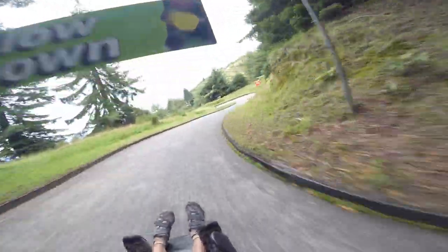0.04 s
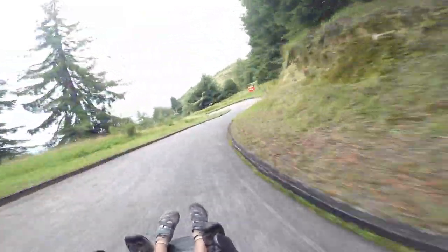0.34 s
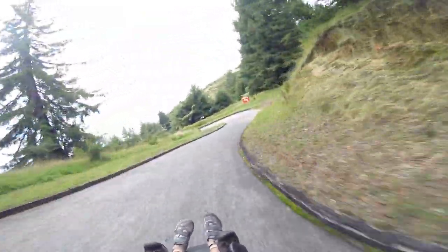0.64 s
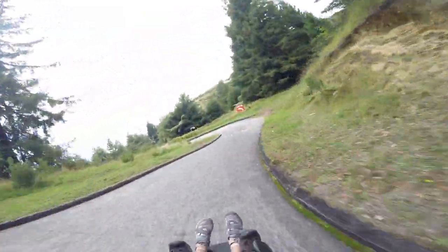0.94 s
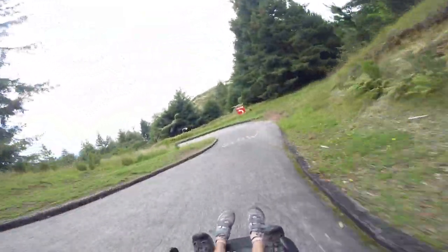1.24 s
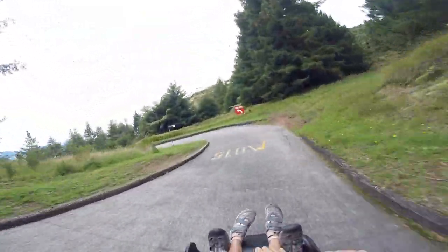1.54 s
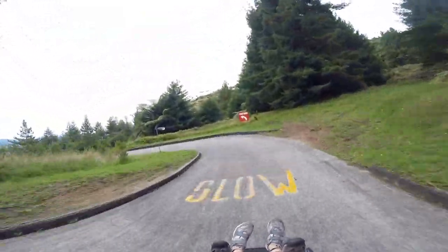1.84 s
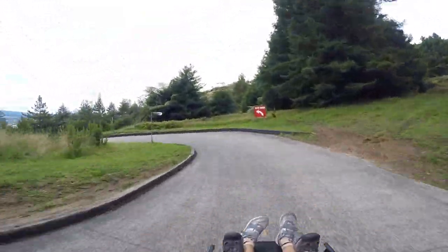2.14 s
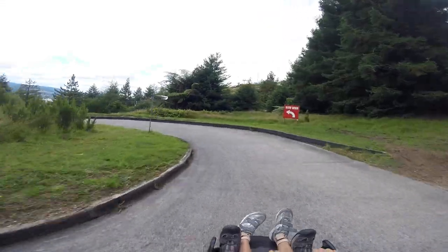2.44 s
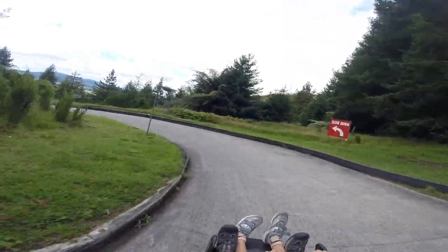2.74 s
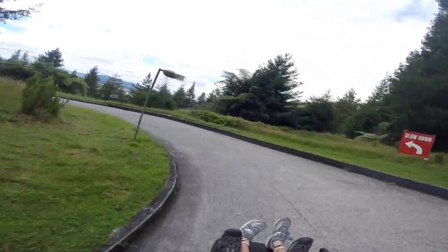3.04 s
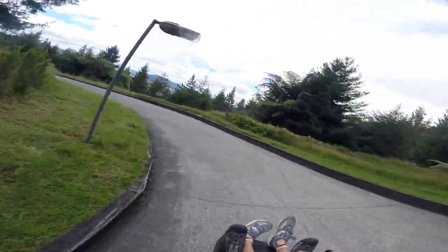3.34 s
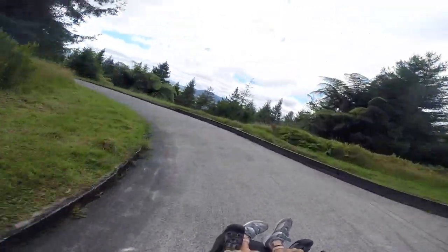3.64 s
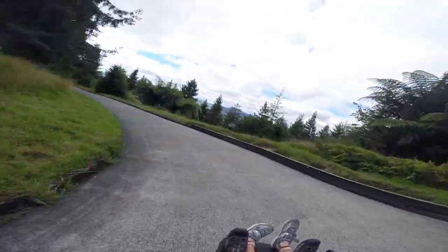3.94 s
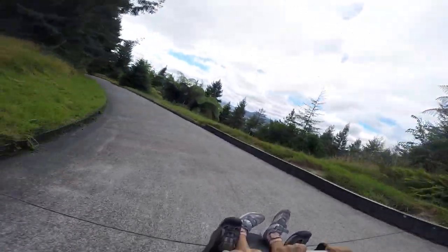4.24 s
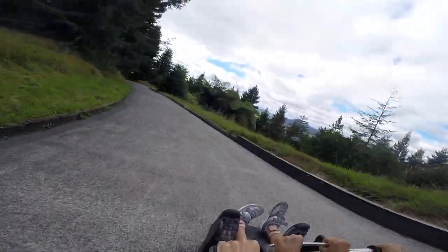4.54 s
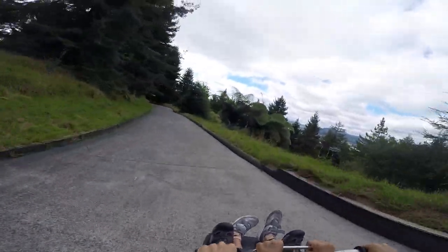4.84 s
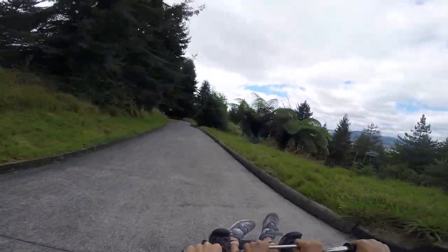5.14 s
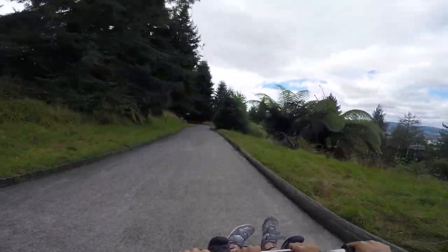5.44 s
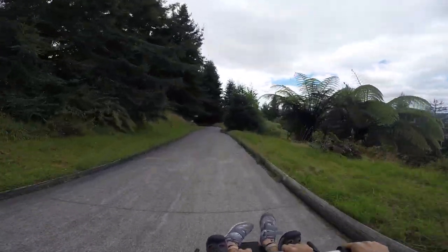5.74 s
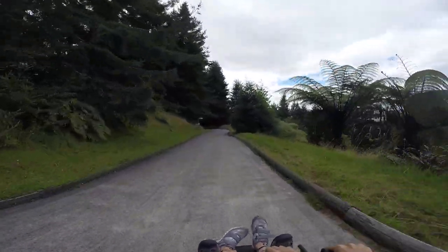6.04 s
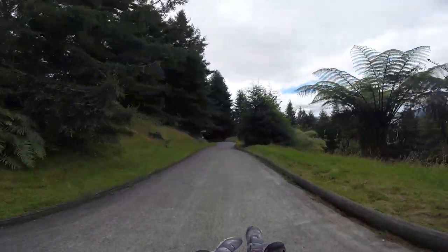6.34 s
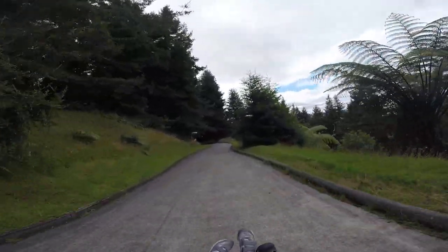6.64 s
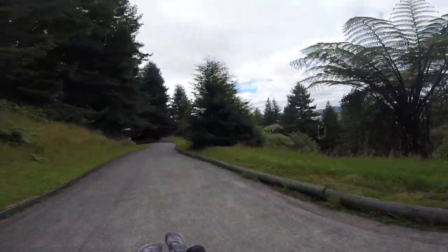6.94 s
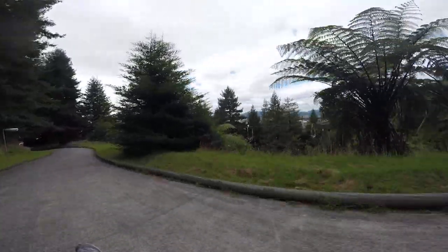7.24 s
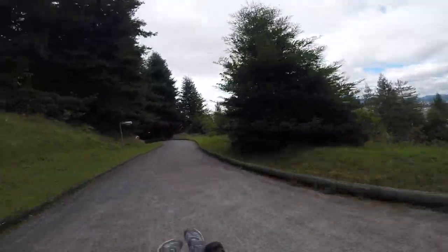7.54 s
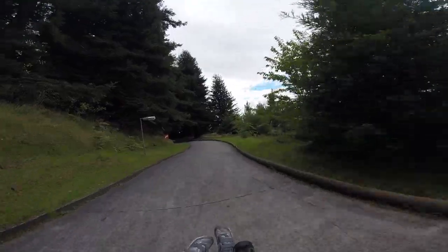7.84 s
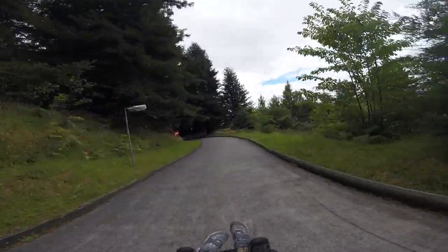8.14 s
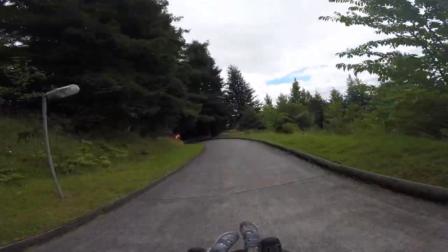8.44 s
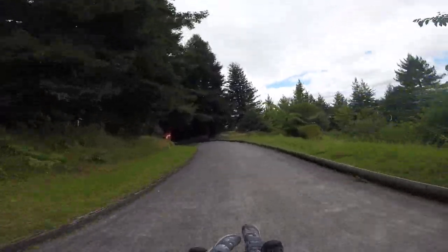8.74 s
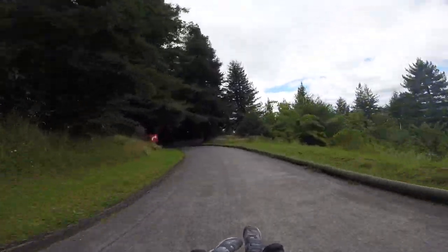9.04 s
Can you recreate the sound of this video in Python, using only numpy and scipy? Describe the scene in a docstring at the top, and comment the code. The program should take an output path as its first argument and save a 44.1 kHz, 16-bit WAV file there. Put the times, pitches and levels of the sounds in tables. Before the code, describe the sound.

A small plastic cart coasts fast down an outdoor asphalt track, heard close from the seat. For all nine seconds, hard wheels make a low, hollow, quickly throbbing rumble with a hum and a gritty hiss, coarsest at the start. Loose plastic parts clatter from about 0.8 to 1.4 seconds, with heavy thuds near 1.2 and 1.7. From 2.3 to 5 seconds, through a bend, the steering linkage adds brighter metallic chatter, with a faint tyre scrub, a tiny squeak at 3.4 and a thud at 4.1. Stones knock in a quick run between 5.3 and 6.5 seconds, with a brief scrub near 5.7. The hum then drops lower and the rattles thin out. Another thud and clatter come around 8.2. Low wind buffets the microphone throughout, strongest near 7 seconds, over a barely audible high electronic whistle.

```python
"""A throbbing rumble with thuds and chatter: a small plastic cart coasts fast down an asphalt track,
microphone at the rider's seat. Just below, road stones drum through hard wheels into the hollow hull
and grit hisses under the tread. Loose parts clack over rough patches; through a long bend the steering
linkage takes over and a tyre scrubs. Wind buffets the microphone over a faint electronic whistle."""
import sys
import numpy as np
from scipy import signal
from scipy.fft import rfft, irfft
from scipy.io import wavfile

SR = 44100
rng = np.random.default_rng(int(sys.argv[2]) if len(sys.argv) > 2 else 0)


def int16_out(signal):
    """Quantize to a 16-bit WAV file."""
    q = np.round(np.clip(np.atleast_2d(signal).T, -1, 1) * 32767)
    wavfile.write(sys.argv[1], SR, q.astype(np.int16))


N = 400428
TIME = np.arange(N) / SR
APEX_S = 4.3  # the long bend loads the wheels most here

# coarseness of the asphalt, above ordinary paving: t/s, level/dB
COARSENESS = [(0, 11), (.6, 6), (1.05, 8), (1.55, 3.5), (2.25, 4), (3.05, -2), (3.3, 3), (5.3, 2),
              (5.75, 4.5), (6.1, 1.5), (9.08, 0)]
# wheels dropping into dips and joints: t/s, peak level/dB, thud f/Hz
DIPS = [(.061, -6, 226), (1.158, -3, 191), (1.714, -3, 205), (2.357, -6, 215), (4.077, -5, 240),
        (4.09, -5, 450), (5.226, -6.5, 240), (5.937, -7, 290), (6.15, -5, 258), (8.18, -1.5, 180),
        (8.282, -6, 178)]
# spectrum of a hard wheel struck on its tread: f/Hz, level/dB
TREAD_SPECTRUM = [(300, -17), (620, -16), (780, 2.5), (900, 3), (1050, 3), (1180, -4), (1300, -6),
                  (1450, -10.5), (1650, -21), (1900, -19.5), (2200, -28), (9000, -78)]
# spectrum of a knock on the hollow body: f/Hz, level/dB
BODY_SPECTRUM = [(150, -7.5), (480, 6.5), (720, 2.5), (1100, -5.5), (1500, -21.5), (3000, -42.5),
                 (9000, -64)]
# the steering linkage's part in the chatter, greatest in the bend: t/s, share/0-1
LINKAGE_SHARE = [(2.25, .1), (2.6, .62), (4.9, .62), (5.5, .25)]
# where the clacks excite the linkage most: t/s, f/Hz
FAVOURED_PITCH = [(1.4, 2200), (2.5, 5000), (3.4, 3700), (4.6, 2300), (7.5, 3900)]


def amp(db):
    """Decibels to gain."""
    return 10 ** (np.asarray(db) / 20)


def unit(x):
    """Scales to rms 1."""
    return x / np.sqrt(np.mean(x ** 2) + 1e-20)


def curve(points, s=TIME):
    """Reads a curve of (time, value) points at the times s."""
    return np.interp(s, *np.transpose(points))


def add(mix, s, sound):
    """Mixes a sound in at time s."""
    part = mix[max(round(s * SR), 0):][:len(sound)]
    part += sound[:len(part)]


def through(x, response):
    """Passes a drive through an impulse response."""
    return signal.oaconvolve(x, response)[:len(x)]


def colour(spectrum, treble_db=0, size=4096):
    """Causal impulse response of energy 1 with a given spectrum and a treble shelf at 5 kHz."""
    hz = np.fft.rfftfreq(size, 1 / SR) + 1
    f, db = np.transpose(spectrum)
    shelf = 1 / (1 + (5000 / hz) ** 4)
    gain = amp(np.interp(np.log(hz), np.log(f), db) + treble_db * shelf)
    cepstrum = irfft(np.log(gain))
    cepstrum[1:size // 2] *= 2  # fold to minimum phase
    cepstrum[size // 2 + 1:] = 0
    response = irfft(np.exp(rfft(cepstrum)))
    return response / np.linalg.norm(response)


def ringing(modes, soft_hz, order=8):
    """Impulse response of energy 1 of a resonant body; contact time cuts what lies above soft_hz."""
    t = np.arange(SR // 5) / SR
    ring = sum(amp(db) * width * np.exp(-np.pi * width * t) * np.cos(2 * np.pi * hz * t)
               for hz, width, db in modes)
    ring = signal.sosfilt(signal.butter(order, soft_hz, fs=SR, output="sos"), ring)
    return ring / np.linalg.norm(ring)


def resonate(x, hz, width_hz):
    """A steep-sided resonance that follows the pitch hz; output of rms 1."""
    carrier = np.exp(2j * np.pi * np.cumsum(hz * np.ones(N)) / SR)
    pole = np.exp(-np.pi * width_hz / SR)
    envelope = signal.lfilter([1], [1, -2 * pole, pole * pole], x / carrier)
    return unit((carrier * envelope).real)


def wander(low_hz, high_hz):
    """Random motion of rms 1 between two rates."""
    hz = np.fft.rfftfreq(N, 1 / SR) + 1e-3
    shape = 1 / np.sqrt((1 + (low_hz / hz) ** 4) * (1 + (hz / high_hz) ** 4) * hz)
    return unit(irfft(rfft(rng.standard_normal(N)) * shape, N))


def stones(per_s, spread_db):
    """Random blows of road stones on the wheels; spread_db sets how unequal they are."""
    force = amp(spread_db * np.minimum(rng.exponential(1, N), 4)) * rng.choice([-1, 1], N)
    return unit(force * (rng.random(N) < per_s / SR))


def whine(hz=11700, db=-76):
    """A faint, slightly unsteady whistle from the electronics at the microphone."""
    return amp(db) * np.sin(2 * np.pi * hz * TIME + .7 * wander(10, 40))


def wind(air_db=-21, shelter_db_per_s=.5, rise_s=.04, fade_s=.34):
    """Low eddies right on the microphone: gusts over a stream of air that eases in among the trees."""
    # gusts: t/s, level/dB, hold/s
    gusts = [(1.4, -21, 0.58), (2.193, -19, 0.24), (3.72, -21.5, 0.23), (4.81, -21.5, 0.23),
             (6.947, -11.5, 0.13), (7.346, -25, 0.37), (8.408, -18.5, 0.44)]
    # spectrum of the buffeting: f/Hz, level/dB
    buffet_spectrum = [(8, -22.5), (22, -9.5), (45, 0), (80, 1), (130, 3), (165, -1.5), (230, -2),
                       (500, -25), (2000, -88.5)]
    eddies = through(rng.standard_normal(N), colour(buffet_spectrum)) * amp(.5 * wander(4.6, 9.8))
    power = amp(air_db - shelter_db_per_s * TIME) ** 2
    for s, db, hold in gusts:
        rise = np.clip((TIME - s) / rise_s, 0, 1)
        fade = np.exp(-np.maximum(TIME - s - hold, 0) / fade_s)
        power += (amp(db) * rise * fade) ** 2
    return np.sqrt(power) * unit(eddies)


def pings(brush_s=.026):
    """A small metal part rings thinly, fed by a short run of brushing contacts."""
    # modes of the part: f/Hz, level/dB, t60/s
    metal_modes = [(8480, -1, 0.14), (8530, 0, .12), (10100, -12, .1)]
    # light touches on it: t/s, peak level/dB
    touches = [(.99, -53), (1.035, -48), (1.08, -51), (1.935, -61), (5.487, -52), (8.191, -57), (8.59, -57),
               (8.79, -67), (8.885, -62)]
    out, t = np.zeros(N), np.arange(SR // 3) / SR
    ring = sum(amp(db - 60 * t / t60) * np.sin(2 * np.pi * hz * t) for hz, db, t60 in metal_modes)
    for s, db in touches:
        jingle = through(rng.standard_normal(len(t)) * np.exp(-t / brush_s), ring)
        add(out, s, amp(db) * jingle / abs(jingle).max())
    return out


def scrubs():
    """A tyre scrubs sideways, the steering squeaks: stick and slip gives fuzzy, swelling tones."""
    # rubs: t/s, length/s, f/Hz, width/Hz, level/dB
    rubs = [(2.48, .54, 3040, 70, -59), (3.402, .04, 3900, 180, -40), (5.697, .11, 1250, 380, -28)]
    out = np.zeros(N)
    for s, length, hz, width_hz, db in rubs:
        swell = np.sin(np.pi * np.clip((TIME - s) / length, 0, 1))
        out += amp(db) * swell * resonate(rng.standard_normal(N), hz, width_hz)
    return out


def linkage(favoured_hz, favour_db=3.5, vary_db=6.5):
    """Impulse response of the steering linkage: a random mix of modes, lifted near favoured_hz."""
    # modes of the linkage: f/Hz, width/Hz, level/dB
    linkage_modes = [(2000, 400, -3), (2470, 220, 2.5), (3000, 230, 0), (3500, 300, -2), (3880, 300, .5),
                     (4500, 220, -6), (5850, 500, -7), (6630, 450, -7.5), (7600, 400, -11.5)]
    excited = []
    for hz, width, db in linkage_modes:
        nearness = np.exp(-(2 * np.log2(hz / favoured_hz)) ** 2)
        excited.append((hz, width, db + favour_db * nearness + vary_db * rng.standard_normal()))
    return ringing(excited, soft_hz=4900, order=4)


def linkage_ticks(road):
    """The loaded linkage ticks lightly over each rough spot."""
    ticks = unit(stones(per_s=220, spread_db=4.5) * amp(7.6 * road))
    return amp(-60) * curve(LINKAGE_SHARE) * through(ticks, linkage(curve(FAVOURED_PITCH, APEX_S)))


def light_bursts(count=54, base_db=-53, spread_db=1.5, longest_s=.0116):
    """Scattered chatter, stronger on coarse asphalt and in the bend: rows of t/s, level/dB, length/s."""
    place, strength, span = rng.random((count, 3)).T
    s = (np.arange(count) + place) / count * N / SR
    db = base_db + 3 * curve(LINKAGE_SHARE, s) + .45 * curve(COARSENESS, s)
    db += spread_db * (2 * strength - 1)
    return list(zip(s, db, longest_s * span))


def rattles(gap_s=.0032, scrape_s=.0018, fade_db=3.5, uneven_db=2.5, count=40, heavy_db=-41):
    """Loose parts near the seat bounce in their play: clacks ring plastic and linkage and jolt the hull."""
    # the loudest bursts of chatter: t/s, level/dB, length/s
    loud_bursts = [(.801, -40, .016), (.845, -36, .016), (.885, -37.5, .022), (.94, -34, .024),
                   (1.035, -36.5, .028), (1.075, -38, .02), (1.113, -36, .01), (1.309, -38, .018),
                   (1.406, -38.5, .01), (1.962, -45, .004), (2.33, -44.5, .03), (2.376, -48, .001),
                   (2.413, -43.5, .028), (2.456, -45, .002), (2.472, -44, .002), (2.528, -45.5, .006),
                   (2.545, -44.5, .001), (2.57, -44, .002), (2.588, -43, .007), (2.633, -41.5, .002),
                   (2.756, -41.5, .031), (2.941, -42.5, .03), (2.984, -43, .004), (3.164, -45.5, .005),
                   (3.189, -40.5, .1), (3.363, -42, .02), (3.408, -40.5, .046), (3.48, -45, .006),
                   (3.547, -44.5, .002), (3.586, -46, .028), (3.671, -38.5, .02), (3.698, -40, .025),
                   (3.867, -43, .013), (3.907, -43, .012), (3.98, -45, .005), (4.0, -42, .007),
                   (4.076, -36, .014), (4.205, -43, .021), (4.268, -44, .045), (4.586, -40.5, .032),
                   (4.691, -42, .014), (4.753, -41.5, .046), (4.923, -46, .026), (5.057, -45, .04),
                   (5.139, -45, .009), (6.21, -40, .006), (7.686, -41, .05), (8.187, -41, .02),
                   (8.267, -42, .035), (8.327, -39.5, .009), (8.694, -41.5, .007)]
    # spectrum of clacking plastic: f/Hz, level/dB
    plastic_spectrum = [(600, -10.5), (1450, 0.5), (1650, 7.5), (1900, 21), (2250, 5), (2900, 7.5),
                        (3800, -5), (5200, -10.5), (6100, -5.5), (7600, -10.5), (9200, -25.5), (14000, -39)]
    out, t = np.zeros(N), np.arange(SR // 8) / SR
    body = colour(BODY_SPECTRUM)
    for s, db, length in loud_bursts + light_bursts():
        at = np.cumsum(gap_s * rng.uniform(.35, 1.65, count))
        at -= at[0]
        force_db = uneven_db * rng.standard_normal(count) - fade_db * at / max(length, 1e-3)
        blows = np.zeros(len(t))
        np.add.at(blows, np.minimum((at * SR).astype(int), len(t) - 1), amp(force_db) * (at <= length))
        clacks, clinks = through(blows, np.exp(-t / scrape_s)) * rng.standard_normal((2, len(t)))
        share = curve(LINKAGE_SHARE, s)
        treble_db = 7 - 3.7 * max(db - heavy_db, 0)  # heavy bursts shake whole panels and sound duller
        plastic = np.sqrt(1 - share) * unit(through(clacks, colour(plastic_spectrum, treble_db)))
        metal = np.sqrt(2 * share) * unit(through(clinks, linkage(curve(FAVOURED_PITCH, s))))
        jolt = amp(16.5 + 5.5 * share) * unit(through(clacks, body))
        gain = amp(db) * np.sqrt((length + .006) / t[-1])  # longer bursts carry more energy
        add(out, s, gain * (plastic + metal + jolt))
    return out


def knocks(die_s=.009, crumble=.13):
    """A larger stone raps the tread and knocks the hollow body: one hard blow, then a crumbling tail."""
    # larger stones under a wheel: t/s, peak level/dB
    large_stones = [(1.134, -3), (3.456, -9), (4.079, -4), (4.204, -8), (4.32, -12), (4.756, -7),
                    (4.955, -9), (5.313, -10), (5.499, -5), (5.523, -7), (5.574, -7), (5.623, -6),
                    (5.673, -6.5), (5.777, -7), (5.989, -7), (6.202, -8), (6.472, -5.5), (7.285, -7.5),
                    (8.293, -8)]
    out, t = np.zeros(N), np.arange(SR // 16) / SR
    body = colour(BODY_SPECTRUM) + .5 * colour(TREAD_SPECTRUM)
    for s, db in large_stones:
        tail = crumble * rng.standard_normal(len(t)) * np.exp(-t / die_s)
        knock = through(signal.unit_impulse(len(t)) + tail, body)
        add(out, s, amp(db) * knock / abs(knock).max())
    return out


def thuds(rise_s=.0037):
    """A drop into a dip or joint gives the hull one short, heavy thud."""
    out, t = np.zeros(N), np.arange(SR // 10) / SR
    envelope = t / rise_s * np.exp(1 - t / rise_s)
    for s, db, hz in DIPS:
        add(out, s, amp(db) * envelope * np.sin(2 * np.pi * hz * t))
    return out


def wheel_throb(turns_hz=9.4):
    """Worn, out-of-round wheels press harder once a turn, and less so half a turn later."""
    angle = 2 * np.pi * np.cumsum(turns_hz * (1 + .03 * wander(.2, 2))) / SR
    return unit(np.cos(angle) + 1.3 * np.cos(2 * angle))


def wheel_roar(load, roar_db=-31, grit_db=-46):
    """Stones drum on the hard wheels just below the seat; finer grit crunches under the same blows."""
    # spectrum of crunching grit: f/Hz, level/dB
    grit_spectrum = [(700, -24.5), (1500, 5.5), (1900, 6.5), (2200, 3), (2900, -0.5), (3600, -6.5),
                     (5200, -17.5), (5900, -13), (7700, -19), (9200, -30.5), (10400, -32.5), (14000, -43)]
    blows = stones(per_s=1500, spread_db=-1)
    roar = unit(through(blows * amp(1.58 * load), colour(TREAD_SPECTRUM)))
    crunch = (blows + 2 * stones(per_s=7000, spread_db=3.5)) * amp(2.06 * load)
    grit = unit(through(crunch, colour(grit_spectrum)))
    coarse_db = curve(COARSENESS)
    return amp(roar_db + .64 * coarse_db) * roar + amp(grit_db + coarse_db) * grit


def wheel_drone(load, rim_hz=471, bend_s=4.8, damping_s=.8):
    """The road keeps the wheels humming and the rims ringing; both fall away outside the bend."""
    # the drone rises under load and drops on the straight: t/s, f/Hz
    drone_pitch = [(0, 220.2), (2.3, 242.3), (3.1, 255), (4.3, 230), (5.2, 258.7), (6.2, 253.3),
                   (6.35, 185.5)]
    drive = stones(per_s=1200, spread_db=.1) * amp(load)
    sway = 1 + .014 * wander(1.3, 3.4)  # the rider's weight shifts
    unloaded = ((TIME - APEX_S) / bend_s) ** 2  # 0 at the apex, about 1 on the straights
    damped_db = 13 * np.exp(-((TIME - APEX_S) / damping_s) ** 2)  # side load right at the apex
    hum = resonate(drive, curve(drone_pitch) * sway, width_hz=23)
    rim = resonate(drive, rim_hz * sway, width_hz=26)
    return amp(-22.3 - 5 * unloaded - damped_db) * hum + amp(-24 - 19 * unloaded) * rim


def bounce_db(rise_s=.0027, settle_s=.055):
    """After each dip the cart bounces and shakes the hull harder for a moment."""
    since_dips = [np.maximum(TIME - s, 0) for s, _, _ in DIPS]
    return 3 * sum((1 - np.exp(-t / rise_s)) * np.exp(-t / settle_s) for t in since_dips)


def hull_rumble(load, base_db=-17):
    """The uneven road shakes the hollow hull, all around the seat, in its low resonances."""
    # modes of the hull: f/Hz, width/Hz, level/dB
    hull_modes = [(185.8, 11, 3.5), (221.3, 42, 1), (269, 63, -1.5), (357, 132, -4), (452.6, 68, -6.5),
                  (528, 24, -9), (638, 14, -15.5)]
    drive = stones(per_s=1800, spread_db=2) * amp(.98 * load)
    gain = amp(base_db + .059 * curve(COARSENESS) + bounce_db())
    return gain * unit(through(drive, ringing(hull_modes, soft_hz=696)))


def scene():
    """Mono, from the seat: one road roughness drives hull and wheels, throbbing as the wheels turn."""
    road = wander(2.5, 79)
    load = .8 * road + .75 * wheel_throb()
    rolling = hull_rumble(load) + wheel_drone(load) + wheel_roar(load) + knocks() + thuds() + scrubs()
    loose_parts = rattles() + linkage_ticks(road) + pings()
    return (rolling + loose_parts + wind() + whine())[None]


def record(dry, ceiling=.88, edge_hz=15000):
    """The recorder rounds off the highest peaks and cuts the treble above edge_hz; both ends fade in and out
    briefly."""
    rounded = dry / (1 + (dry / ceiling) ** 8) ** (1 / 8)
    faded = rounded * signal.windows.tukey(N, .001)
    lowpass = signal.firwin(511, edge_hz, window=("kaiser", 9), fs=SR)
    return signal.oaconvolve(faded, lowpass[None], "same")


dry = scene()
out = record(dry)
int16_out(out)
```